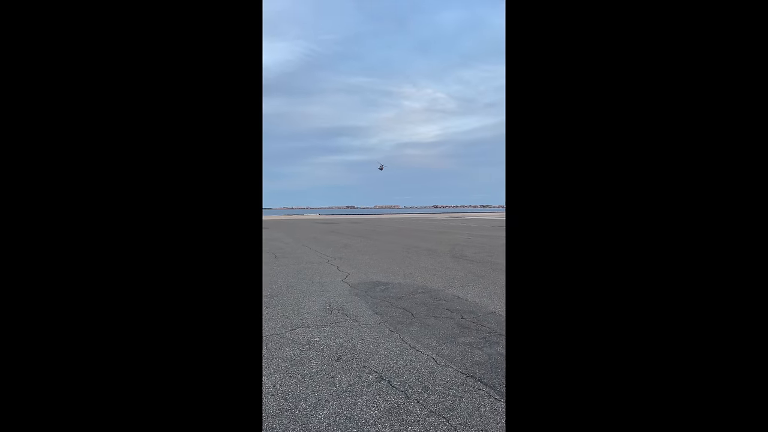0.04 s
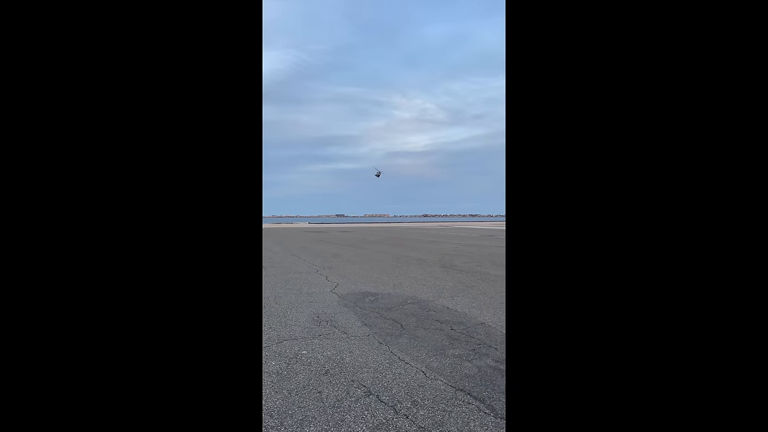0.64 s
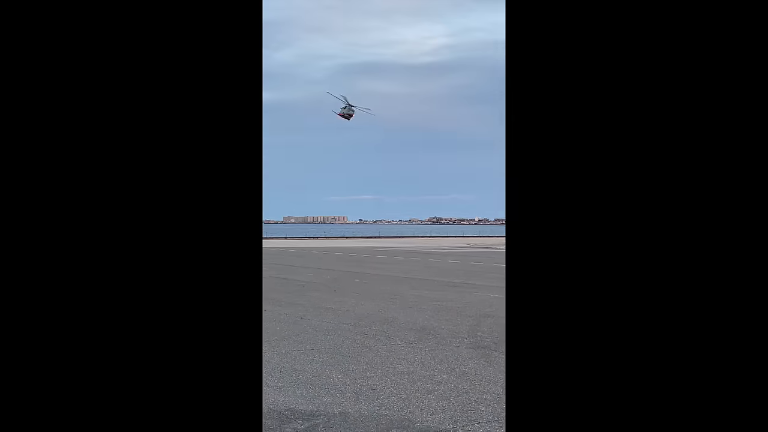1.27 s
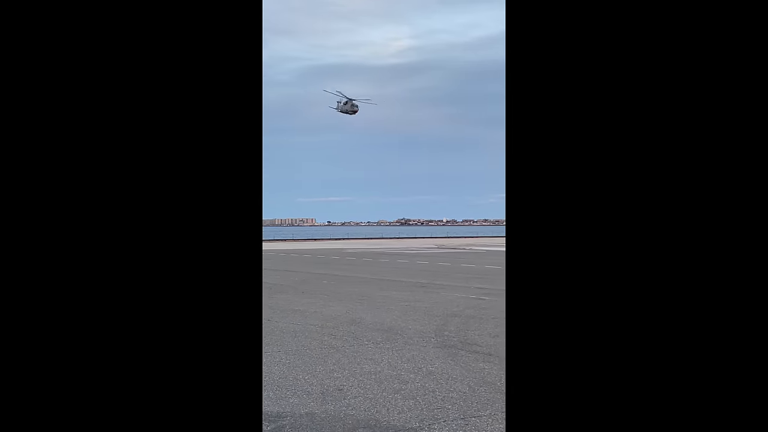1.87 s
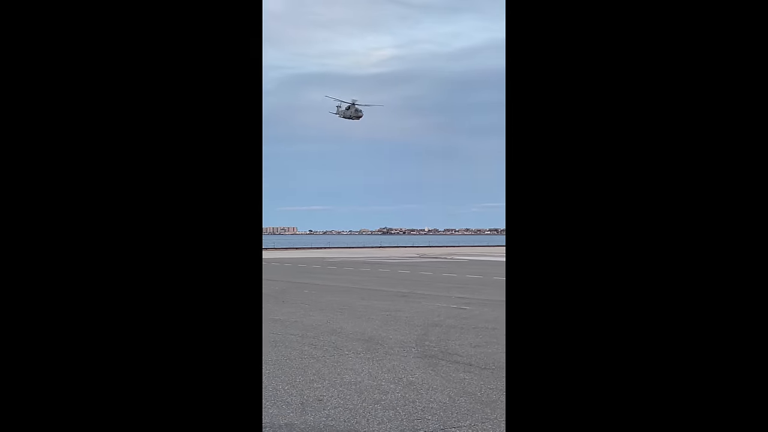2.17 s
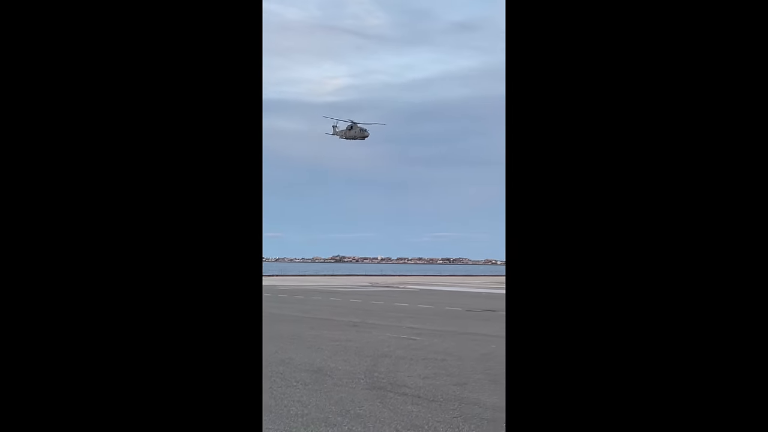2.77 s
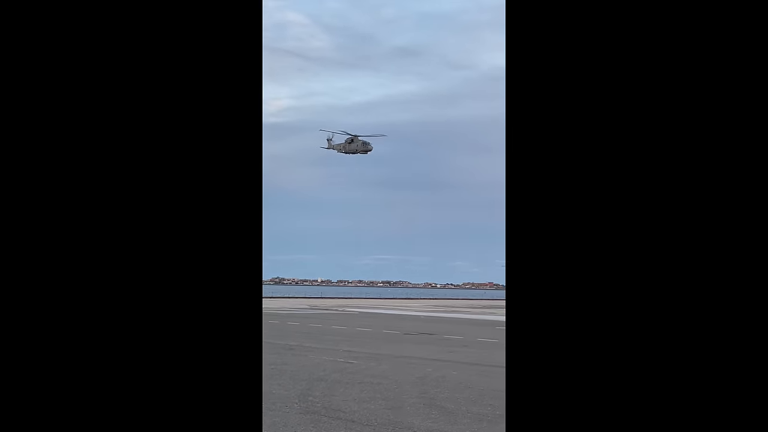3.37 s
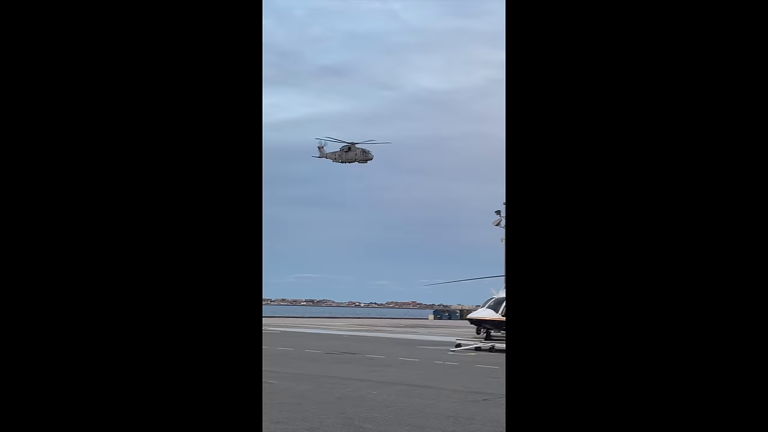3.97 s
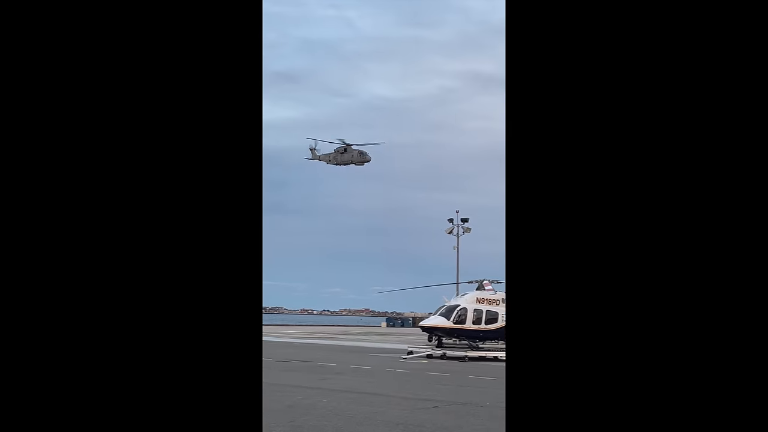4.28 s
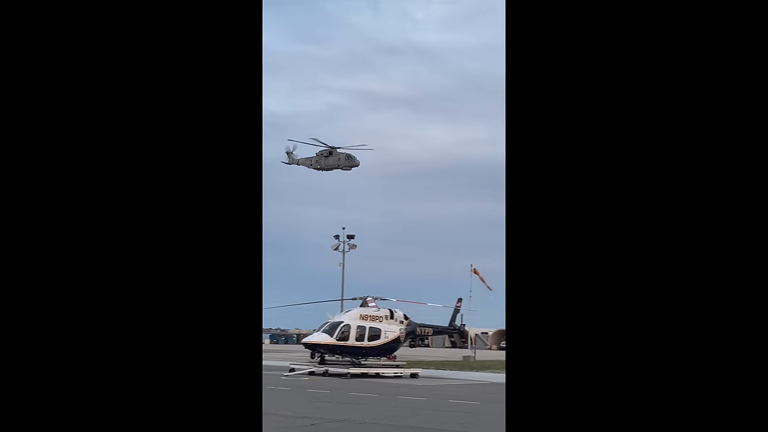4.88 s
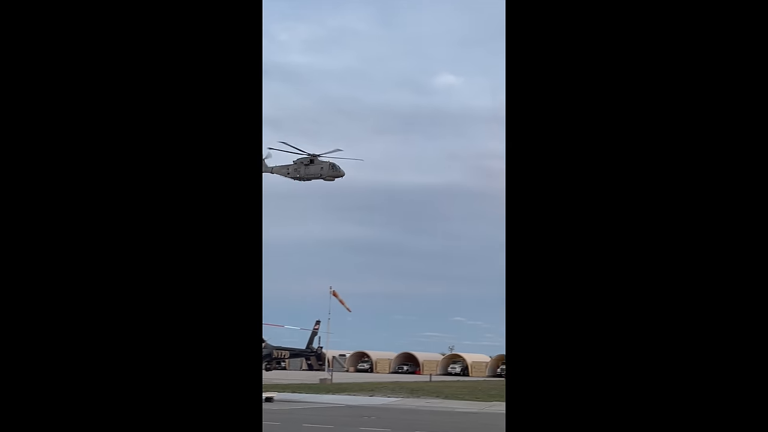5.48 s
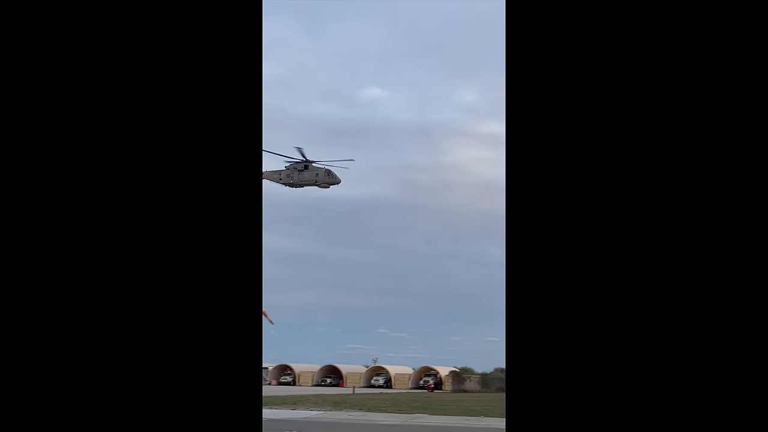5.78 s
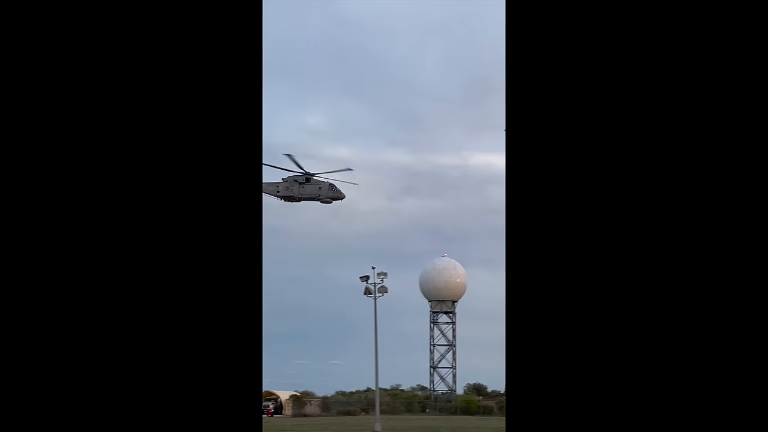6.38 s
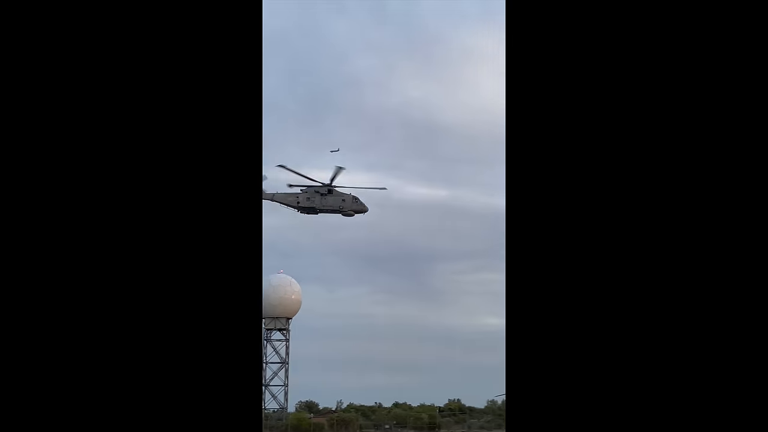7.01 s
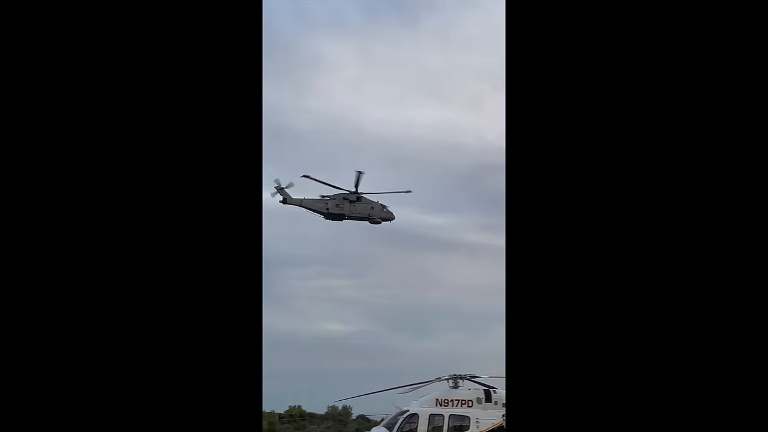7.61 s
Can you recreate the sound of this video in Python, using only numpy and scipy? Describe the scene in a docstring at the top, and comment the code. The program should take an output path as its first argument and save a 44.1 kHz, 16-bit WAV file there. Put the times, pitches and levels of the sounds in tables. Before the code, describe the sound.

A large helicopter approaches low over an open airfield, heard in stereo from the tarmac. From the start there is a fast, deep rotor thumping, about twenty beats a second, with a low tail rotor drone and a soft roar. From about 0.6 seconds hard blade slaps crack out in uneven runs, staying loud until just after 3 seconds. A faint turbine whine comes and goes from around 2 seconds, with a pulsing high whistle from the blade tips. After 3.5 seconds the thumping softens and a chopped, rushing roar with hiss takes over, its tone sweeping in a hollow whoosh. Stray slaps land near 4, 4.6 and 5.4 seconds. From about 5 seconds the rotors and whine sink in pitch as the helicopter draws level, still roaring loudly at the end, around 7.6 seconds.

```python
"""An airfield apron, heard through a two-port microphone as a big five-bladed helicopter comes in low.
From about 300 m out to 60 m abeam, the main rotor thumps and slaps the vortices of its own blades,
the tail rotor drones, and both chop the roar of the turbulent wake; blade tips and turbines whistle.
The rotors and the whine sink in pitch as it draws level, and the reflection off the tarmac
sweeps a comb through the roar."""
import sys
import numpy as np
from scipy import signal
from scipy.fft import rfft, irfft, next_fast_len
from scipy.io import wavfile

SR = 44100
rng = np.random.default_rng(int(sys.argv[2]) if len(sys.argv) > 2 else 0)


def master(y):
    """Save y as 16-bit WAV."""
    cut = np.clip(np.atleast_2d(y).T, -1, 1)
    pcm = np.round(cut * 32767)  # scale
    wavfile.write(sys.argv[1], SR, pcm.astype(np.int16))


N = 337301
TIME = np.arange(N) / SR
SPEED_M_PER_S, CLOSEST_M, CLOSEST_S = 40, 60, 7.5  # straight flight path past the microphone

# rasp of the forward-facing engine intakes: (time [s], level [dB])
RASP_LEVEL = [(0, -48.5), (1, -43.5), (1.8, -36), (2.5, -50), (3.6, -39), (4.3, -56), (7.65, -46)]
# compressor whine, coming and going: (time [s], level [dB])
WHINE_LEVEL = [(0, -64), (1.7, -50), (2.65, -50), (2.8, -34), (3.15, -44), (3.4, -43), (3.55, -36),
               (3.7, -44), (4.1, -48), (4.57, -47), (4.7, -35), (5.05, -36), (5.3, -44), (5.65, -40),
               (6.2, -49), (6.8, -44), (7.3, -34.5), (7.65, -38)]
# compressor pitch at the microphone: (time [s], pitch [Hz])
WHINE_HZ = [(0, 3990), (2.5, 4050), (3.5, 3990), (4.8, 3945), (6, 3840), (7, 3710), (7.65, 3590)]
# blade tip whistle: (time [s], level [dB], fade at the top of the sweep [dB])
TIP_LEVEL = [(0, -75, 41), (1.15, -58, 32), (1.4, -51, 35), (1.6, -40.5, 38), (2.4, -39.5, 38),
             (2.8, -44, 34), (3.6, -48.5, 23), (4.6, -51, 12), (5.05, -41, 12), (5.4, -42, 12),
             (5.6, -48, 12), (6.1, -47, 14), (7.65, -44, 5)]
# strength of each of the five tips: (gain while falling [dB], gain while rising [dB])
TIP_GAINS = [(6.5, 10), (-2.5, 8), (0.5, 10.5), (3, 7.5), (-2.5, -5)]
# the wake's rumble, roar, rush, hiss and air bands: (low edge [Hz], high edge [Hz])
WAKE_ZONES = [(90, 260), (330, 900), (1100, 3000), (5300, 7500), (10000, 12000)]
# wake turbulence: (time [s], roar level [dB], rush level [dB])
WAKE_LEVEL = [(0, -35.5, -35.5), (.45, -31.5, -37.5), (.8, -28, -34), (1.4, -25, -30.5), (2.1, -20.5, -27),
              (2.65, -21.5, -28.5), (3.4, -20, -27), (4, -15, -25.5), (4.35, -20.5, -31), (4.75, -20, -31),
              (5.05, -17, -23.5), (5.42, -19, -24), (5.6, -21, -30.5), (5.95, -17.5, -23.5),
              (6.65, -15, -27.5), (6.9, -19, -25.5), (7.25, -18.5, -23), (7.65, -20, -25)]
# hiss of the wake: (time [s], level [dB])
HISS_LEVEL = [(0, -70), (.9, -66.5), (1.8, -53.5), (3.3, -49), (3.6, -43.5), (4.4, -48.5), (4.8, -43),
              (5.18, -39.5), (5.6, -44), (6.5, -39.5), (6.8, -44), (7.3, -38), (7.65, -38)]
# colour of the wake on top of its zone levels: (frequency [Hz], gain [dB])
WAKE_COLOUR = [(30, -9), (60, 4.5), (100, 3.5), (160, 4), (270, 1), (480, 0.5), (650, 1), (950, 0),
               (1300, 0), (2300, 2), (3300, 1.5), (4300, 3.5), (6000, -1), (8500, 5.5), (11000, -5.5)]
# chopping of the wake by the main rotor: (time [s], depth [0-1])
MAIN_CHOP_DEPTH = [(0, 0), (1, 0.14), (3, 0.08), (3.6, 0.07), (7.65, 0)]
# hollow whoosh within the roar: (time [s], centre [Hz], level over the roar [dB])
WHOOSH_BAND = [(0, 420, 3), (.95, 428, -1.5), (2, 640, -16.5), (3.3, 590, -11.5), (4, 570, -12),
               (4.95, 596, -3.5), (5.25, 520, -8), (5.6, 460, -2), (6, 445, -2), (6.4, 435, -8.5),
               (7.65, 430, -2)]
# brief swells of the whoosh: (time [s], gain [dB], width [s])
WHOOSH_SURGES = [(3.96, 5, .07), (5.0, 3, .06), (5.445, 5, .018), (5.96, 3.5, .06)]
# tail blade passages at the microphone, Doppler shift included: (time [s], rate [1/s])
TAIL_BLADE_RATE = [(0, 72.1), (1.5, 72.1), (1.9, 72.7), (2.7, 72.6), (4.05, 71.6), (5.25, 70.9),
                   (6.45, 68.4), (7.65, 66)]
# tail rotor drone: (time [s], fundamental level [dB], octave level [dB], overtone level [dB])
DRONE_LEVEL = [(0, -20.5, -34, -45.5), (1, -18, -28, -35.5), (2, -20.5, -37, -33.5),
               (2.8, -20.5, -28, -33.5), (3.3, -23.5, -33, -35), (3.65, -28, -28, -30.5),
               (4.1, -23.5, -29, -35.5), (4.4, -21, -31, -28), (4.8, -24, -18.5, -30),
               (5.3, -24.5, -36.5, -28), (6.3, -22, -28.5, -34.5), (7.05, -27.5, -35, -32.5),
               (7.65, -19.5, -52, -29)]
# its octave and overtones: (harmonic [x tail blade rate], sideband [x main blade rate], gain [dB])
OCTAVE_PARTIALS = [(2, 0, 0), (2, 1, -4)]
OVERTONE_PARTIALS = [(1, 1, -9), (3, 0, -1), (3, 1, -7), (4, 0, -7), (5, 0, -4), (6, 0, -8)]
# main blade passages at the microphone, Doppler shift included: (time [s], rate [1/s])
MAIN_BLADE_RATE = [(0, 19.92), (.75, 19.77), (1.25, 19.88), (1.75, 20.12), (2.25, 20.22), (2.75, 20.2),
                   (3.25, 20.1), (4.25, 19.86), (5.25, 19.55), (5.75, 19.28), (6.25, 18.92), (6.75, 18.65),
                   (7.65, 18.25)]
# thump, strongest ahead of the aircraft: (time [s], deep level [dB], middle level [dB], sharp level [dB])
THUMP_LEVEL = [(0, -24, -26, -25.5), (1.3, -20, -20, -22), (2.2, -20.5, -17.5, -14.2), (3, -20, -29, -15.8),
               (3.35, -21, -32, -20), (3.65, -20.5, -34, -32), (4.15, -26, -34, -38), (4.9, -22, -36, -31),
               (6, -23, -38, -33), (6.7, -28, -38, -36), (7.65, -35, -38, -38)]
# the thump's three parts: (harmonic [x main blade rate], relative level within the part [dB])
DEEP_HARMONICS = [(2, 0.5), (3, 6.5)]
MIDDLE_HARMONICS = [(4, 0)]
SHARP_HARMONICS = [(5, 2.5), (6, 0), (7, 0), (8, -2.5), (9, -4), (10, -5.5), (11, -8.5), (12, -16),
                   (13, -26), (14, -13), (15, -22.5), (16, -17.5), (17, -30), (18, -13.5)]
# regular blade slap on the approach: (time [s], spike level [dB])
BEAT_SLAP_LEVEL = [(.4, -26.5), (.749, -27), (1.3, -20), (1.85, -14.5), (2.3, -15), (2.6, -20), (2.95, -17),
                   (3.3, -22)]
# hard slaps on or between beats: (time [s], spike level [dB], crackle [0-1], hollow knock [0-1])
ACCENT_SLAPS = [(0.646, -18, 0.05, 0.95), (.663, -19, 0.1, 0.7), (.695, -11, 0.06, 0.8),
                (.746, -16.5, 0.05, 0.6), (.761, -14, 0.02, 1), (.797, -16, .05, 0.2),
                (.812, -23, 0.05, 0.94), (0.8452, -4.5, 0.04, 0.3), (0.866, -14.5, 0, 0.9),
                (.894, -18, .08, .8), (0.9105, -8.5, 0.06, 0.85), (.944, -12.5, 0.07, 0.2),
                (0.964, -16, .03, .2), (0.996, -12, .05, 0.2), (1.047, -11.5, 0.04, 0.2),
                (1.098, -10.5, 0, .1), (1.147, -11, .1, 0.2), (1.198, -11, 0.02, 0.4),
                (1.249, -8, 0.09, 0.2), (1.296, -20, .08, .1), (1.398, -9, 0.12, 0),
                (1.449, -12, 0.29, 0.06), (1.549, -9, 0.2, .2), (1.6, -14, 0.2, 0.1),
                (1.698, -7, 0.11, 0.1), (1.795, -11.5, 0.2, 0), (1.894, -8, .08, 0),
                (1.946, -10.5, 0.17, .2), (2.043, -11, 0.2, .1), (2.094, -8.5, 0.25, 0.3),
                (2.143, -6, .1, 0), (2.193, -8, 0.13, 0.1), (2.292, -7.5, 0.12, 0.1), (2.443, -18, 0.5, 0),
                (2.538, -12, 0.22, 0), (2.587, -20.5, 0.35, .1), (2.886, -18, 0.2, 0.1),
                (2.938, -13, .45, 0.1), (2.985, -13, 0.35, .1), (3.038, -8, 0.16, 0.3),
                (3.046, -7.5, 0.06, 0.3), (4.011, -9.5, .01, .6), (4.039, -12, .05, 0.6),
                (4.139, -12, 0.1, 0), (4.57, -11.5, 0, 0.5), (4.643, -23, 0.3, 0.3), (4.901, -22, 0, 0.4),
                (5.431, -8, .03, 1), (5.445, -4.5, .05, 1)]
# delay of the tarmac reflection behind the direct sound: (time [s], lag [ms])
TARMAC_LAG = [(0, 1), (1.5, 1.05), (2, 1.27), (2.5, 1.47), (3.3, 1.5), (4.1, 1.49), (4.5, 1.62), (5, 1.89),
              (5.5, 2.14), (6, 2.36), (6.6, 2.48), (7.65, 2.46)]
# strength of that reflection: (time [s], gain [0-1])
TARMAC_GAIN = [(0, .15), (2.5, .35), (3.6, .65), (4.1, .8), (4.8, .75), (6, .62), (7.65, .65)]
# lead of the left microphone port over the right: (frequency [Hz], phase [rad])
PORT_PHASE = [(0, 0), (250, -.38), (550, -.75), (1000, -.6), (2600, .55), (4130, .8), (4650, 2),
              (5170, 4.9), (5600, 6.1), (6400, 6.6), (8000, 8.5), (8400, 9.3), (9700, 9.5), (10900, 11.3),
              (11600, 12.5)]
# balance of the left port over the right: (frequency [Hz], gain [dB])
PORT_GAIN = [(450, .1), (700, -1.5), (1150, -2.6), (1800, .1)]


def from_db(db):
    """Decibels to gain."""
    return 10 ** (np.asarray(db) / 20)


def rms_one(x):
    """Scale to unit power."""
    return x / np.sqrt(np.mean(x ** 2) + 1e-20)


def in_time(rows):
    """One curve for each column after the time."""
    s, *columns = np.transpose(rows)
    return [np.interp(TIME, s, column) for column in columns]


def at_hz(points, hz):
    """Read a spectrum on a log-frequency axis."""
    points_hz, values = np.transpose(points)
    return np.interp(np.log(hz), np.log(points_hz), values)


def filtered(x, hz, kind, order=2):
    """Causal Butterworth filter."""
    return signal.sosfilt(signal.butter(order, hz, kind, fs=SR, output="sos"), x + 1e-18)


def drift(hz):
    """Random wander of unit spread, mostly slower than hz."""
    step = 40  # samples
    pole = np.exp(-2 * np.pi * step * hz / SR)
    noise = rng.standard_normal(N // step + 2002)
    slow = signal.lfilter([1], [1, -2 * pole, pole * pole], noise)[2000:]
    return np.interp(np.arange(N) / step, np.arange(len(slow)), rms_one(slow))


def sine(hz):
    """Unit-power tone that follows a pitch curve."""
    return np.sqrt(2) * np.sin(2 * np.pi * np.cumsum(hz) / SR)


def narrow_noise(hz, width_hz):
    """Unit-power band of noise whose centre follows a pitch curve."""
    a, b = filtered(rng.standard_normal((2, N)), width_hz / 2, "low", order=3)
    angle = 2 * np.pi * np.cumsum(hz) / SR
    return rms_one(a * np.cos(angle) + b * np.sin(angle))


def beam(peak_db, peak_s, rise_db_per_s, fall_db_per_s):
    """Level in dB of a sound whose beam sweeps over the microphone once."""
    return peak_db - np.maximum(rise_db_per_s * (peak_s - TIME), fall_db_per_s * (TIME - peak_s))


def once_a_blade(passages, depth, sharpness):
    """A gain of mean 1 that peaks at every blade passage."""
    bump = np.exp(sharpness * (np.cos(2 * np.pi * passages) - 1))
    return 1 - depth + depth * bump / bump.mean()


def airfield(level_db):
    """Faint, steady hiss of the open field, different at each port."""
    noise = rng.standard_normal((2, N))
    return from_db(level_db) * rms_one(filtered(noise, [1500, 4770], "band", order=4))


def intake_rasp(chop):
    """Bright noise from the engine intakes, chopped by the blades."""
    noise = rms_one(filtered(rng.standard_normal(N), [2040, 4180], "band", order=3))
    return from_db(in_time(RASP_LEVEL)[0]) * np.sqrt(chop) * noise


def turbines(air_db):
    """A blurred compressor whine, a thin one far above it, and a gear tone that beams past once."""
    hz, = in_time(WHINE_HZ)
    whine_db, = in_time(WHINE_LEVEL)
    whine = narrow_noise(hz, width_hz=90) + from_db(-7.5) * narrow_noise(hz, width_hz=500)
    thin = from_db(air_db - 9) * sine(3.08 * hz + 170 * drift(200))
    gear_db = beam(peak_db=-38, peak_s=3.56, rise_db_per_s=5.5, fall_db_per_s=5.5)
    gear = from_db(gear_db + 3 * drift(25)) * sine(.502 * hz + 22 * drift(60))
    return from_db(whine_db) * whine + gear + thin


def tip_whistle(blades, low_hz, high_hz, flutter_db):
    """The rough whistle of each tip arches down and up in pitch as the blade swings round."""
    level_db, fade_db = in_time(TIP_LEVEL)
    arch = np.cos(np.pi * blades) ** 2
    hz = low_hz + (high_hz - low_hz) * arch
    falling_db, rising_db = np.array(TIP_GAINS)[blades.astype(int) % len(TIP_GAINS)].T
    rising = np.clip(.5 - np.sin(2 * np.pi * blades), 0, 1)
    swing_db = falling_db + (rising_db - falling_db) * rising - fade_db * arch
    return from_db(level_db + swing_db + flutter_db * drift(2.5)) * narrow_noise(hz, width_hz=750)


def over_tarmac(x, dull_hz):
    """The ground returns a duller copy, later and stronger as the aircraft rises in the sky."""
    lag_ms, = in_time(TARMAC_LAG)
    gain, = in_time(TARMAC_GAIN)
    dull = signal.sosfiltfilt(signal.butter(1, dull_hz, fs=SR, output="sos"), x)
    echo = np.interp(TIME - lag_ms / 1000, TIME, dull)
    return (x + gain * echo) / np.sqrt(1 + gain ** 2)


def blade_chop(blades, tail_blades, side_on):
    """The wake's power pulses with both rotors; side-on, the tail cuts deeper and clatters in clusters."""
    main = once_a_blade(blades, depth=in_time(MAIN_CHOP_DEPTH)[0], sharpness=6.2)
    tail = once_a_blade(tail_blades, depth=.6 * side_on, sharpness=3.4)
    clatter_db = side_on * (1.2 * drift(100) + .7 * drift(12))
    return main * tail * from_db(clatter_db) ** 2


def wake_levels(distance_m):
    """Rumble, roar, rush, hiss and air in dB; air, the highest hiss, comes in over the second half."""
    rumble_db = beam(peak_db=-24, peak_s=3.2, rise_db_per_s=1.8, fall_db_per_s=.2)
    roar_db, rush_db = in_time(WAKE_LEVEL)
    hiss_db, = in_time(HISS_LEVEL)
    fade_in_db = -.22 * np.maximum(distance_m - 100, 0)
    air_db = hiss_db - 10.5 + fade_in_db
    return [rumble_db, roar_db, rush_db, hiss_db, air_db]


def whoosh(roar_db, chop):
    """A hollow, chopped band of the roar whose centre glides; it surges a few times."""
    hz, over_db = in_time(WHOOSH_BAND)
    surge_db = sum(db * np.exp(-.5 * ((TIME - s) / width) ** 2) for s, db, width in WHOOSH_SURGES)
    return from_db(roar_db + over_db + surge_db) * np.sqrt(chop) * narrow_noise(hz, width_hz=173)


def wake(zone_db, chop, patchy_db):
    """Turbulence in wavering third-octave bands, chopped by the blades mainly from 180 Hz to 5 kHz."""
    low, high = np.transpose(WAKE_ZONES)
    log_centres = np.log(low * high) / 2
    density_db = np.array(zone_db) - 10 * np.log10(high - low)[:, None]
    edges = 28 * 2 ** (np.arange(28) / 3)
    white = rng.standard_normal((2, N))  # neighbouring bands take different noise
    shared_waver = .64 * drift(33)
    out = np.zeros(N)
    for k, (lo, hi) in enumerate(zip(edges, edges[1:])):
        hz = np.sqrt(lo * hi)
        weights = np.array([np.interp(np.log(hz), log_centres, row) for row in np.eye(len(low))])
        db = weights @ density_db + at_hz(WAKE_COLOUR, hz) + patchy_db * (shared_waver + drift(34))
        depth = 1 / (1 + (180 / hz) ** 2) / (1 + (hz / 5000) ** 2)
        band = rms_one(filtered(white[k % 2], [lo, hi], "band"))
        out += band * np.sqrt((hi - lo) * (1 - depth + depth * chop)) * from_db(db)
    return out


def tail_rotor(tail_blades, blades, waver_db):
    """A drone with its octave; the main rotor's wake roughens the overtones and adds sidebands."""
    drone_db, octave_db, overtones_db = in_time(DRONE_LEVEL)
    out = from_db(drone_db) * np.cos(2 * np.pi * tail_blades)
    buffeted = tail_blades + .04 * drift(22)
    groups = (octave_db, OCTAVE_PARTIALS, tail_blades), (overtones_db, OVERTONE_PARTIALS, buffeted)
    for level_db, partials, passages in groups:
        for k, sideband, db in partials:
            gain = from_db(level_db + db + waver_db * k * drift(4.4))
            out += gain * np.cos(2 * np.pi * (k * passages + sideband * blades))
    return np.sqrt(2) * out


def slap_events(blades, crackle, scatter_db):
    """The hard slaps, plus one for each blade passage of the approach that has none within 10 ms."""
    s, db = np.transpose(BEAT_SLAP_LEVEL)
    beats = np.interp(np.arange(1, int(blades[-1])) - .055, blades, TIME)  # just ahead of each passage
    levels = np.interp(beats, s, db) + scatter_db * rng.standard_normal(len(beats))
    gap_s = np.abs(beats[:, None] - np.array(ACCENT_SLAPS)[:, 0]).min(axis=1)
    free = (gap_s > .01) & (s[0] < beats) & (beats < s[-1])
    return ACCENT_SLAPS + [(at, level, crackle, 0) for at, level in zip(beats[free], levels[free])]


def blade_slaps(events, trail_hz=386, knock_hz=470, knock_s=.0026, crackle_s=.0039):
    """A blade cuts the vortex of the one before: a pressure spike, torn crackle and a hollow knock."""
    age = np.arange(SR // 20) / SR
    impulse = 1. * (age == 0)
    spike = filtered(filtered(impulse, 202, "high", order=3), 880, "low", order=4)
    radius, angle = np.exp(-np.pi * trail_hz / 2 / SR), 2 * np.pi * trail_hz / SR
    allpass = [1, -2 * radius * np.cos(angle), radius * radius]
    spike = signal.lfilter(allpass[::-1], allpass, spike)  # the lows trail behind
    spike /= np.abs(spike).max()
    body = np.sin(2 * np.pi * knock_hz * age) * (age / knock_s / 2) ** 2 * np.exp(2 - age / knock_s)
    burst = age / crackle_s * np.exp(1 - age / crackle_s)
    out = np.zeros(N)
    for s, db, crackle, knock in events:
        torn = burst * rms_one(filtered(rng.standard_normal(len(age)), [880, 2900], "band", order=4))
        at = round(s * SR)
        out[at:at + len(age)] += from_db(db) * (spike + crackle * torn + knock * body)
    return out


def main_rotor_thump(blades, smear_rad, uneven_db):
    """Each blade gives a low thump; the microphone's bass cut makes its low harmonics ring later."""
    parts = DEEP_HARMONICS, MIDDLE_HARMONICS, SHARP_HARMONICS
    out = np.zeros(N)
    for level_db, harmonics in zip(in_time(THUMP_LEVEL), parts):
        wave = sum(from_db(db) * np.cos(2 * np.pi * k * blades + smear_rad / k) for k, db in harmonics)
        out -= from_db(level_db + uneven_db * drift(27)) * rms_one(wave)
    return out


def two_ports(x, diffuse_db, decay_s):
    """Sound reaches the ports out of step and unequally; each gets its own scatter from the apron."""
    size = next_fast_len(N + SR // 10)
    hz = np.arange(size // 2 + 1) * SR / size
    lead_rad = np.interp(hz, *np.transpose(PORT_PHASE))
    left = np.exp(.5j * lead_rad) * from_db(at_hz(PORT_GAIN, hz + 1) / 2)
    direct = irfft(rfft(x, size) * np.array([left, 1 / left]), size)[:, :N]
    age = np.arange(SR // 2) / SR
    scatter = rng.standard_normal((2, len(age))) * np.exp(-age / decay_s)
    scatter /= np.linalg.norm(scatter, axis=1, keepdims=True)
    diffuse = signal.fftconvolve(filtered(x, 170, "high", order=1)[None], scatter, axes=1)[:, :N]
    return direct + from_db(diffuse_db) * diffuse


def scene():
    """From the apron: both rotors beat in the bass and chop the wake; engines and tips whistle above."""
    distance_m = np.hypot(CLOSEST_M, SPEED_M_PER_S * (TIME - CLOSEST_S))
    # running counts of blade passages
    blades = .22 + np.cumsum(in_time(MAIN_BLADE_RATE)[0]) / SR
    tail_blades = .16 + np.cumsum(in_time(TAIL_BLADE_RATE)[0]) / SR
    pulses = blades - .025  # chop and thump lag each passage slightly
    zone_db = wake_levels(distance_m)
    _, roar_db, _, _, air_db = zone_db
    chop = blade_chop(pulses, tail_blades, side_on=CLOSEST_M / distance_m)
    roar = wake(zone_db, chop, patchy_db=1.4)
    thump = main_rotor_thump(pulses, smear_rad=25, uneven_db=1)
    drone = tail_rotor(tail_blades, blades, waver_db=.7)
    tips = tip_whistle(blades + .03, low_hz=5150, high_hz=10000, flutter_db=1.5)
    engines = turbines(air_db) + intake_rasp(chop)
    slaps = blade_slaps(slap_events(blades, crackle=.33, scatter_db=2))
    combed_roar = over_tarmac(roar + whoosh(roar_db, chop), dull_hz=1590)
    aircraft = engines + tips + combed_roar + drone + slaps + thump
    return two_ports(aircraft, diffuse_db=-18, decay_s=.13) + airfield(level_db=-49)


def record(dry):
    """The microphone sheds the bass below 29 Hz; peaks are rounded and the top is cut at 11.4 kHz."""
    x = signal.sosfiltfilt(signal.butter(4, 29, "high", fs=SR, output="sos"), dry)
    rounded = x / (1 + (x / .95) ** 8) ** (1 / 8)
    return signal.sosfilt(signal.ellip(8, .2, 70, 11400, fs=SR, output="sos"), rounded)


dry = scene()
out = record(dry)
master(out)
```